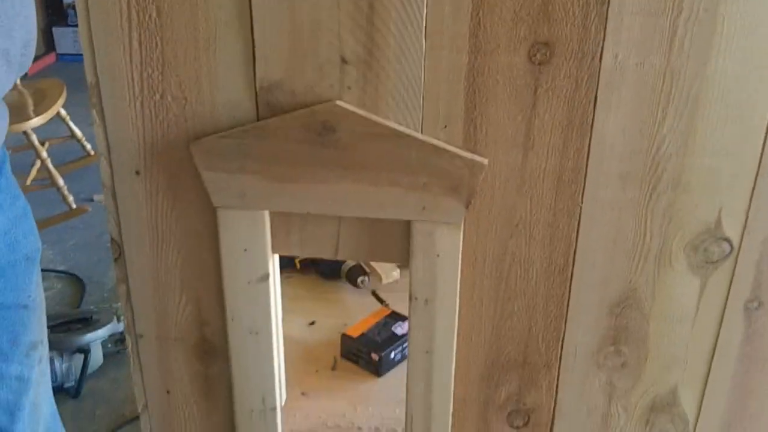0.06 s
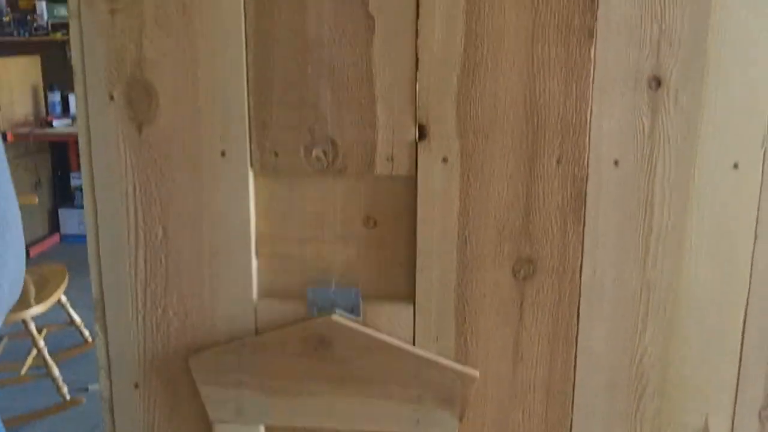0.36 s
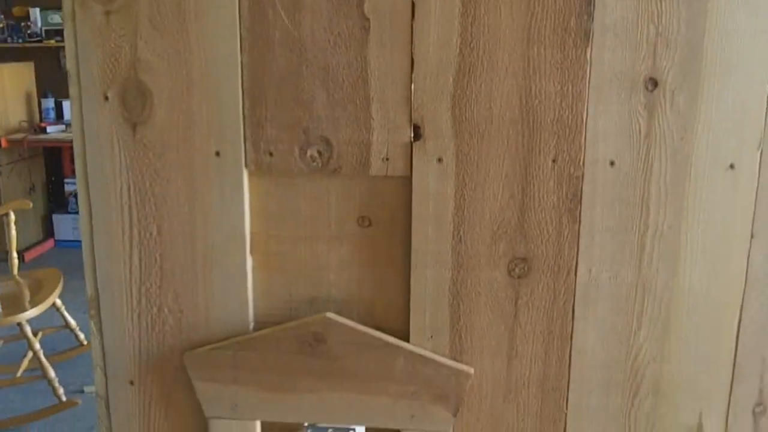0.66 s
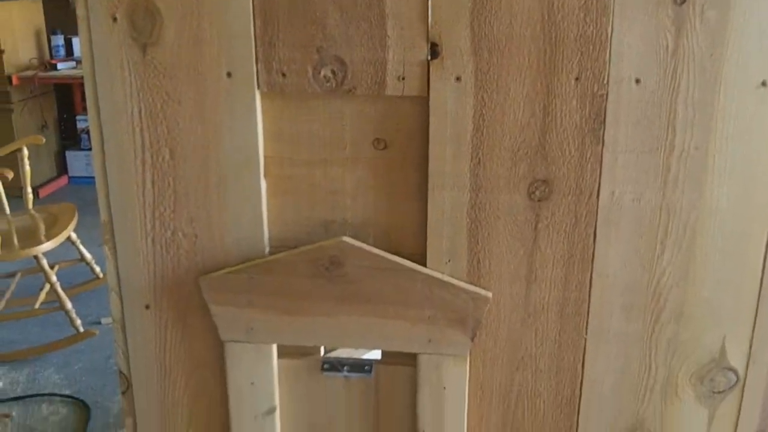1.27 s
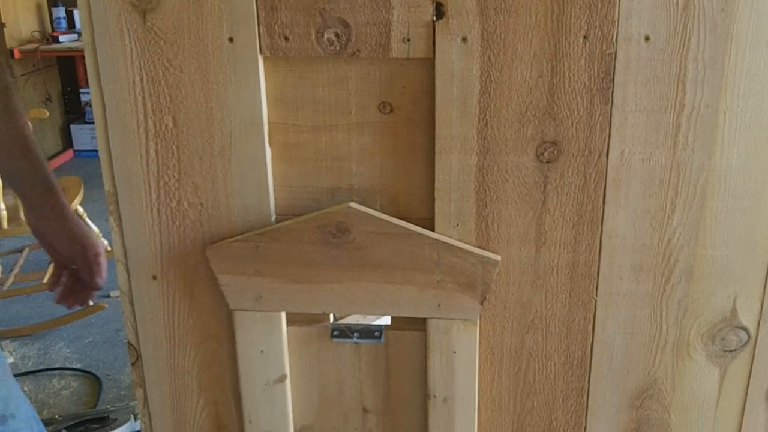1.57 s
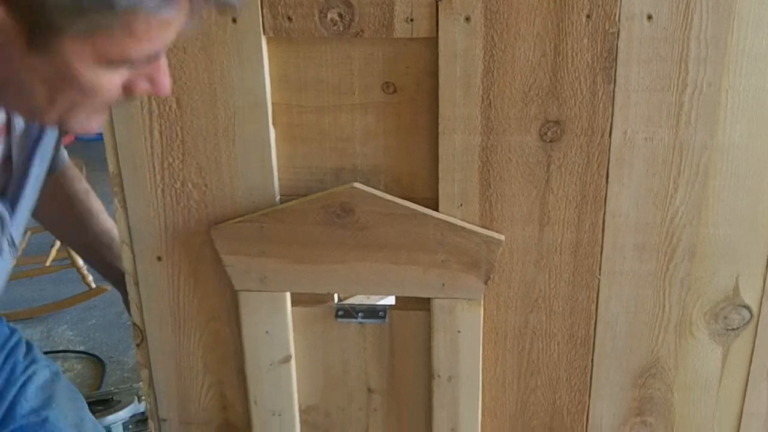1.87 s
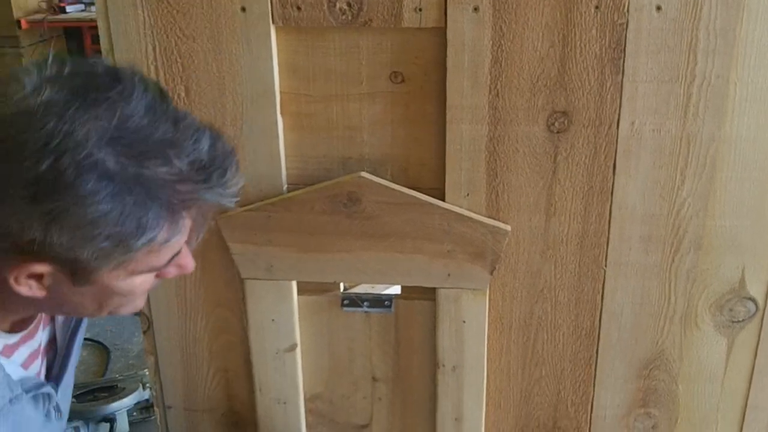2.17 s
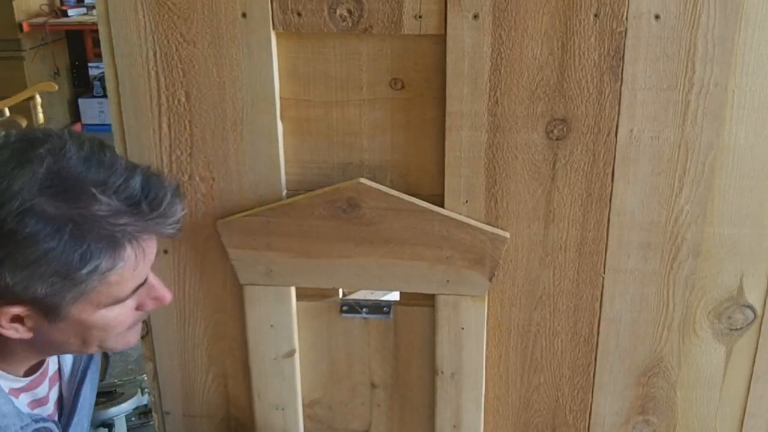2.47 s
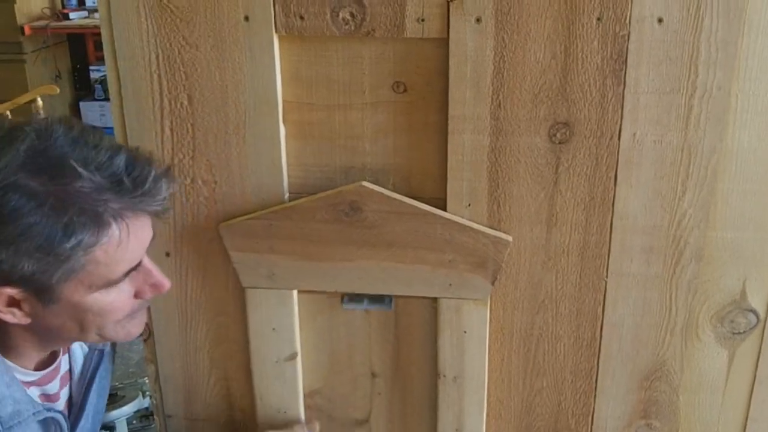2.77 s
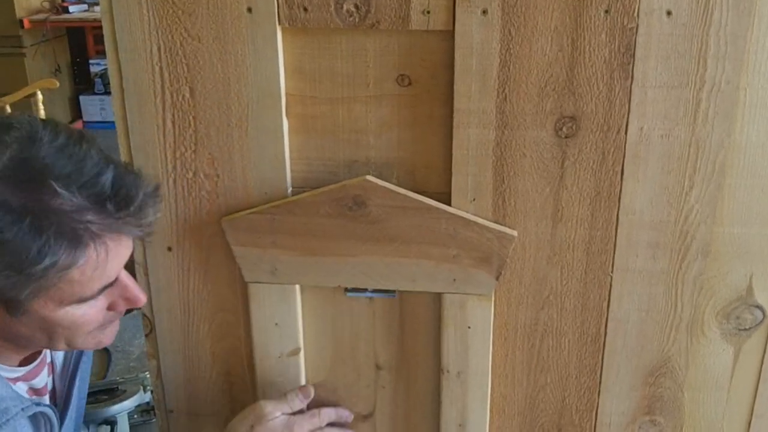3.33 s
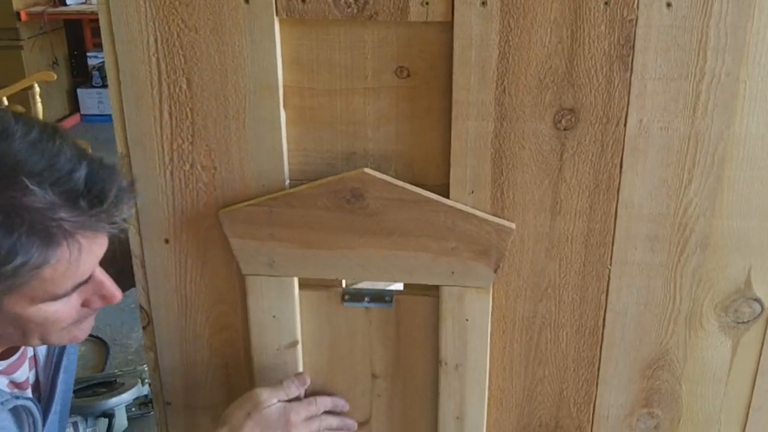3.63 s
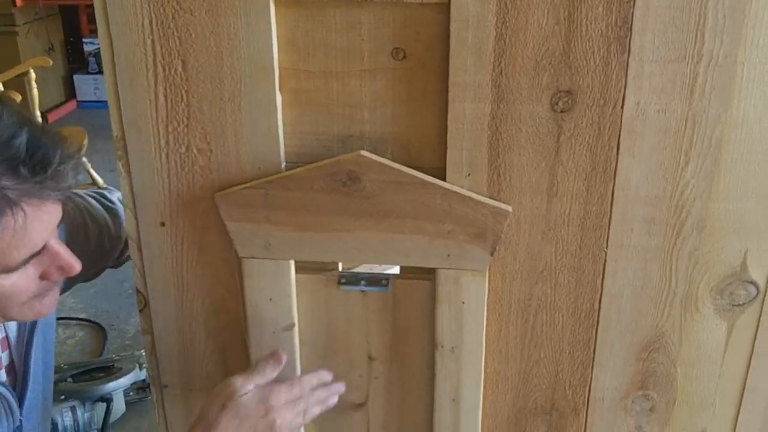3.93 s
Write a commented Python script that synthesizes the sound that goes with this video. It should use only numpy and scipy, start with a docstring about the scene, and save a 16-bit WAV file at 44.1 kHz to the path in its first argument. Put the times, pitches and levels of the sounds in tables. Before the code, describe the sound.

Wood sliding on wood, twice, with juddering scrapes, sharp knocks and tiny squeaks.

```python
"""Sliding wooden door panel

A small panel slides up its wooden frame and later down again, close by in a quiet workshop.
It scrapes in the grooves, binds and squeaks, and knocks against the boards, which ring briefly.
The wall judders with the friction and hums on after the lift.
Between the two strokes someone shifts their feet: soles scuff and cloth rustles."""
import sys
import numpy as np
from scipy import signal
from scipy.fft import rfft, irfft, next_fast_len
from scipy.io import wavfile
from scipy.ndimage import uniform_filter1d, map_coordinates

SR = 44100
rng = np.random.default_rng(int(sys.argv[2]) if len(sys.argv) > 2 else 0)


def unload_wav(signal):
    """Save mono or channel-first audio to the path in sys.argv[1] as 16-bit WAV at rate SR, clipped to [-1, 1]."""
    wavfile.write(
        sys.argv[1],
        SR,
        np.round(np.clip(np.atleast_2d(signal).T, -1, 1) * 32767).astype(np.int16),
    )


N = 176400


def amp(db):
    """Decibels to gain."""
    return 10 ** (np.asarray(db) / 20)


def unit(x):
    """Scale to rms 1."""
    return x / np.sqrt(np.mean(x ** 2) + 1e-20)


def steady(x):
    """Hold the running rms at 1."""
    return x / np.sqrt(np.abs(uniform_filter1d(x * x, size=5000)) + 1e-20)


def along(points, hz):
    """Interpolate (Hz, value) points on a log frequency axis."""
    f, v = np.transpose(points)
    return np.interp(np.log(hz + 1), np.log(f + 1), v)


def clock():
    """Time of every sample in seconds."""
    return np.arange(N) / SR


def wobble(per_s):
    """Smooth random curve, per_s knots a second."""
    return map_coordinates(rng.standard_normal(int(N * per_s / SR) + 4), [clock() * per_s])


def filtered(x, response):
    """Apply a complex frequency response."""
    size = 2 * next_fast_len(len(x))
    return irfft(rfft(x, size) * response(np.fft.rfftfreq(size, 1 / SR)), size)[:len(x)]


def causal(db):
    """Minimum-phase response with this gain."""
    cepstrum = irfft(np.log(amp(db)))
    cepstrum[1:len(cepstrum) // 2] *= 2
    cepstrum[len(cepstrum) // 2 + 1:] = 0
    return np.exp(rfft(cepstrum))


def resonance(f, hz, width_hz):
    """One resonance of peak gain 1."""
    return 1j * f * width_hz / (hz * hz - f * f + 1j * f * width_hz)


def noise(spectrum):
    """Coloured noise of rms 1."""
    return unit(filtered(rng.standard_normal(N), lambda f: amp(along(spectrum, f))))


def slips(per_s, size):
    """Friction impulses of random time and strength."""
    return (rng.random(size) < per_s / SR) * rng.standard_normal(size)


def add(out, start_s, x):
    """Mix x into out from start_s."""
    part = out[max(0, round(start_s * SR)):][:len(x)]
    part += x[:len(part)]


# Clatter spectrum of the boards. Each row: frequency in Hz, level in dB.
WOOD_SPECTRUM = [(60, -11), (1200, 3), (2400, 3.5), (4000, -4), (5200, -15), (6500, -18.5), (8000, -35),
                 (10000, -32.5), (16000, -48.5)]
BRIGHT_FROM_HZ, BRIGHT_FULL_HZ, TOP_HZ = 1660, 4670, 8900


def wood(force, bright_db, top_db):
    """The boards colour a contact force, with a treble tilt for the hardness of the contact."""
    tilt = [(BRIGHT_FROM_HZ, 0), (BRIGHT_FULL_HZ, bright_db), (TOP_HZ, top_db)]
    return filtered(force, lambda f: causal(along(WOOD_SPECTRUM, f) + along(tilt, f)))


# Ring of the boards: three thuds, a hollow note, then bright modes.
# Each row: frequency in Hz, level in dB, t60 in seconds.
BOARD_MODES = [(238, 2, 0.082), (376, -1, 0.049), (544.4, -5.5, 0.064), (892, 4, 0.019), (1646, -8, 0.054),
               (2272, -1.5, 0.023), (2690, -11, 0.023), (3062, -2.5, 0.029), (3940, -8.5, .03)]
# Blows on the frame. Each row: start in seconds, level in dB, thud in dB, hollow note in dB,
# brightness in dB, clatter t60 in seconds.
FRAME_KNOCKS = [(.026, -24, -10, -4, -3.5, 0.054), (.081, -25, -10, 6, -20, 0.074),
                (0.1496, -11.5, -16.5, 8.5, -2, 0.033), (0.375, -22.5, -7, 12.5, -4, .02),
                (.488, -32, -18, -6, -7.5, .03), (.720, -9.5, -20.5, -21, 9.5, 0.04),
                (.984, -25.5, -29, -19, 19, 0.035), (2.739, -41, 2.5, 5.5, 15, 0.048),
                (2.806, -48.5, 11, 9, -1, 0.054), (2.866, -38, 7.5, 2.5, -1, 0.061),
                (2.953, -12.5, -2.5, -4, 1.5, 0.051), (3.080, -11.5, -13.5, -11, 1, 0.022),
                (3.192, -21.5, -11, -3, 14.5, 0.057), (3.364, -33, -12, 5.5, -52, 0.056),
                (3.4017, -12, -3, 1, 14, 0.037), (3.641, -13, -10, 0.5, 11, 0.036),
                (3.662, -21, -12, -5, 16, 0.022), (3.807, -12.5, -4, -5.5, -2, 0.053),
                (3.886, -19, -15, 4, 4.5, 0.066)]
ATTACK_S, SNAP_DB, RING_DB = 0.0008, 6.5, 1.5


def knocks():
    """The panel hits the frame: a snap, a short clatter and the ringing modes of the boards."""
    out, t = np.zeros(N), np.arange(SR // 5) / SR
    hz, mode_db, t60_s = np.transpose(BOARD_MODES)[:, :, None]
    rise = 1 - np.exp(-t / ATTACK_S)
    for start_s, db, thud_db, hollow_db, bright_db, clatter_t60_s in FRAME_KNOCKS:
        top_db = 23.5 + 0.88 * db  # weaker blows are duller
        burst = rng.standard_normal(len(t)) * rise * amp(-60 * t / clatter_t60_s)
        clatter = wood(burst, bright_db, top_db - 18)
        snap = wood(signal.unit_impulse(len(t)), bright_db, top_db)
        contact = clatter / np.std(clatter[:SR // 200]) + amp(SNAP_DB) * snap / np.abs(snap).max()
        detune, scatter_db, polarity = rng.standard_normal((3, len(BOARD_MODES), 1))
        struck_db = mode_db + np.select([hz < 600, hz < 1100], [thud_db, hollow_db]) + scatter_db
        pitch_hz = hz * (1 + 0.016 * detune)
        modes = amp(struck_db - 60 * t / t60_s) * np.sign(polarity) * np.sin(2 * np.pi * pitch_hz * t)
        add(out, start_s, amp(db) * (contact + amp(RING_DB) * rise * modes.sum(axis=0)))
    return out


# The panel's travel up, then down. Each row: time in seconds, judder in dB, scrape in dB.
UP_STROKE = [(0, -26, -32), (.07, -39, -46.5), (.135, -34, -51.5), (.18, -32, -35.5), (.32, -30, -38),
             (.43, -36, -30), (.515, -36, -50.5), (.56, -30.5, -25.5), (.69, -33, -39), (.83, -35.5, -34),
             (1.0, -43.5, -40.5), (1.05, -49, -51.5), (1.45, -63.5, -71.5)]
DOWN_STROKE = [(2.72, -82, -95.5), (2.75, -41.5, -50), (2.85, -45.5, -64.5), (2.92, -30.5, -37.5),
               (2.98, -28, -41), (3.12, -34.5, -32), (3.2, -28, -30), (3.37, -33, -42.5),
               (3.44, -28.5, -30.5), (3.54, -30, -41), (3.62, -26.5, -35.5), (3.77, -31.5, -36),
               (3.92, -29, -31), (4.0, -27, -37.5)]


def stroke(rows):
    """Judder and scrape gains along one stroke, silent outside it."""
    t = clock()
    times_s, *levels_db = np.transpose(rows)
    moving = (t >= times_s[0] - 0.05) & (t <= times_s[-1] + 0.05)
    return np.array([amp(np.interp(t, times_s, db)) for db in levels_db]) * moving


# Wood rubbing on wood. Each row: frequency in Hz, level in dB.
SCRAPE_SPECTRUM = [(100, -14.5), (450, -5.5), (950, 5), (1500, -1.5), (3000, -4), (4000, -8.5),
                   (5000, -14.5), (6200, -20.5), (7900, -41.5), (9000, -39), (16000, -65.5)]
FINE_SLIPS_PER_S, BOARD_T60_S = 3500, 0.042
GROOVE_HZ, GROOVE_WIDTH_HZ, GROOVE_DB = [2272, 2752, 3246, 3878], 53, 1


def scrape():
    """Fine slips excite the boards and the groove notes; the colour drifts as the contact moves."""
    t = np.arange(SR // 10) / SR
    board_ring = rng.standard_normal(len(t)) * amp(-60 * t / BOARD_T60_S)
    force = slips(FINE_SLIPS_PER_S, N) * amp(wobble(per_s=57))
    ringing = signal.fftconvolve(force, board_ring / np.linalg.norm(board_ring))[:N]
    rub = filtered(force + 0.5 * ringing, lambda f: causal(along(SCRAPE_SPECTRUM, f)))
    notes = filtered(rub, lambda f: sum(resonance(f, hz, GROOVE_WIDTH_HZ) for hz in GROOVE_HZ))
    travel = np.cumsum(1 + 0.025 * wobble(per_s=9))
    drifting = map_coordinates(rub + amp(GROOVE_DB) * notes, [travel], mode="mirror")
    _, gain = stroke(UP_STROKE) + stroke(DOWN_STROKE)
    return gain * unit(drifting)


# Wall resonances. Each row: frequency in Hz, width in Hz, level in dB.
WALL_MODES = [(100.6, 16, -1), (187.9, 18, 1.5), (234, 17.7, 3.5), (300, 19, 0.5), (350, 65, -3),
              (467, 71.5, -4.5)]
COARSE_SLIPS_PER_S, PUSH_DB, PUSHES_PER_S = 900, 1.5, 22


def judder():
    """Coarse slips shake the wall as the hand moves the panel in uneven pushes."""
    def wall(f):
        modes = sum((-1) ** k * amp(db) * resonance(f, hz, width_hz)
                    for k, (hz, width_hz, db) in enumerate(WALL_MODES))
        return modes / (1 + (f / 900) ** 4)

    shake = steady(filtered(slips(COARSE_SLIPS_PER_S, N), wall))
    gain, _ = stroke(UP_STROKE) + stroke(DOWN_STROKE)
    return gain * unit(shake * amp(PUSH_DB * wobble(PUSHES_PER_S)))


# The panel binds. Each row: start in seconds, length in seconds, level in dB, brightness in dB,
# squeak pitch in Hz, squeak over grating in dB.
PANEL_CATCHES = [(0.349, 0.016, -23, 4, 908.5, -4.5), (0.373, 0.0018, -23, 0, 1887, 5),
                 (0.395, 0.0043, -24.5, -3, 2037, 1.5), (0.5309, 0.013, -14, 2, 1894, -4),
                 (0.577, 0.0024, -18, 2, 2373, -0.5), (0.901, 0.073, -33.5, 12, 3120, -10),
                 (0.929, 0.0049, -21, 7, 2750, 3), (1.207, 0.13, -69.5, 14, 1660, 6),
                 (2.896, 0.032, -36.5, 8, 996, -5), (2.935, 0.016, -29, 4, 896, 1.5),
                 (3.06, 0.02, -28.5, 9, 923, 0), (3.5502, 0.042, -35, -6, 868, 6),
                 (3.785, 0.013, -28.5, -7, 883, 9.5)]
WAVER_HZ, FLUTTER_DB, RELEASE_T60_S = 97, 4.6, 0.047


def catches():
    """A run of harder slips grates and squeaks on one unsteady note, then rings out."""
    out, t = np.zeros(N), np.arange(SR // 5) / SR
    for start_s, length_s, db, bright_db, squeak_hz, squeak_db in PANEL_CATCHES:
        grate = unit(wood(slips(FINE_SLIPS_PER_S, len(t)), bright_db, top_db=-5))
        pitch_hz = squeak_hz + WAVER_HZ * wobble(per_s=600)[:len(t)]
        flutter = amp(FLUTTER_DB * wobble(per_s=280)[:len(t)])
        squeak = unit(np.sin(2 * np.pi * np.cumsum(pitch_hz) / SR) * flutter)
        gate = np.minimum(t / ATTACK_S, 1) * amp(-60 * np.maximum(t - length_s, 0) / RELEASE_T60_S)
        add(out, start_s, amp(db) * gate * (grate + amp(squeak_db) * squeak))
    return out


def rasp(rubbing):
    """Hard rubbing adds a thin sizzle that grows faster than its treble."""
    treble = filtered(rubbing, lambda f: np.minimum(f / BRIGHT_FULL_HZ, 1) ** 2)
    treble_rms = np.sqrt(np.abs(uniform_filter1d(treble ** 2, size=SR // 200)))
    sizzle = filtered(rng.standard_normal(N), lambda f: resonance(f, hz=13300, width_hz=700) ** 2)
    return amp(-23.5) * treble_rms ** 1.2 * unit(sizzle)


# Spells of hard drag. Each row: start in seconds, length in seconds, level in dB.
WALL_SHUDDERS = [(0.531, .18, -36.5), (3, 1.0, -43.5)]


def shudders():
    """The whole wall shakes slowly when the panel drags hard."""
    shake = filtered(rng.standard_normal(N), lambda f: resonance(f, hz=38.5, width_hz=19) ** 2)
    gain = np.zeros(N)
    for start_s, length_s, db in WALL_SHUDDERS:
        end_s = start_s + length_s
        gain += amp(db) * np.interp(clock(), [start_s - 0.02, start_s, end_s, end_s + 0.023], [0, 1, 1, 0])
    return gain * steady(shake)


HUM_HZ, HUM_DB, HUM_PEAK_S, HUM_RISE_DB_PER_S, HUM_T60_S = 122.3, -36, 0.83, 200, 1.44


def wall_hum():
    """A low note of the wall swells as the lift ends, then rings on."""
    t = clock() - HUM_PEAK_S
    level_db = HUM_DB + np.where(t < 0, HUM_RISE_DB_PER_S * t, -60 * t / HUM_T60_S)
    pitch_hz = HUM_HZ * (1 + 0.038 * wobble(per_s=100))
    return amp(level_db) * np.sin(2 * np.pi * np.cumsum(pitch_hz) / SR)


# Spectra of soles and cloth. Each row: frequency in Hz, level in dB.
SOLE_SPECTRUM = [(60, -2), (200, 4.5), (420, 0.5), (800, -10.5), (1500, -19.5), (5000, -55)]
CLOTH_SPECTRUM = [(500, -12.5), (3000, 7.5), (4300, 0), (7000, -18.5), (15000, -36.5)]
# Shifts of the feet. Each row: peak time in seconds, 12 dB rise in seconds, 35 dB fall in seconds,
# sole in dB, cloth in dB.
FOOT_SHUFFLES = [(1.725, 0.048, 0.25, -81, -54.5), (1.856, 0.0031, 0.54, -40.5, -57),
                 (1.918, 0.016, 0.14, -41, -42), (2.24, 0.04, 0.17, -41, -58)]


def shuffles():
    """Soles scuff the floor and cloth rustles in soft swells."""
    out, t = np.zeros(N), clock()
    sole = noise(SOLE_SPECTRUM)
    cloth = noise(CLOTH_SPECTRUM) * amp(2.8 * wobble(per_s=150))
    for peak_s, rise_s, fall_s, sole_db, cloth_db in FOOT_SHUFFLES:
        swell_db = np.where(t < peak_s, 12 * (t - peak_s) / rise_s, 35 * (peak_s - t) / fall_s)
        out += amp(swell_db) * (amp(sole_db) * sole + amp(cloth_db) * cloth)
    return out


# Workshop decay. Each row: frequency in Hz, t60 in seconds.
ROOM_DECAY = [(100, 0.61), (3000, 0.29), (12000, 0.27)]
ROOM_DB, ROOM_CUTOFF_HZ, ROOM_BUILD_S = -18, 7000, 0.014


def reverb(near):
    """The workshop's diffuse reflections; the treble dies first."""
    hz, t, bands = signal.stft(rng.standard_normal(SR // 2), SR, nperseg=256)
    decay = amp(-60 * t / along(ROOM_DECAY, hz)[:, None])
    _, tail = signal.istft(bands * decay, SR, nperseg=256)
    tail = filtered(tail, lambda f: 1 / (1 + (f / ROOM_CUTOFF_HZ) ** 4))
    tail *= np.minimum(np.arange(len(tail)) / SR / ROOM_BUILD_S, 1)
    return amp(ROOM_DB) * signal.fftconvolve(near, tail / np.linalg.norm(tail))[:N]


# Workshop background. Each row: frequency in Hz, level in dB.
AIR_SPECTRUM = [(25, 2), (270, -9), (4000, -28), (6500, -33), (7900, -49.5), (9000, -36.5), (15000, -36),
                (16000, -61)]


def air():
    """Faint, steady rumble and hiss of the still room."""
    return amp(-54) * noise(AIR_SPECTRUM)


def scene():
    """Panel, wall and feet in the workshop, in mono."""
    rubbing = catches() + scrape()
    near = knocks() + rubbing + rasp(rubbing) + judder() + shuffles()
    return (near + reverb(near) + shudders() + wall_hum() + air())[None]


CLIP_CEILING, BAND_LIMIT_HZ = 1.05, 16400


def record(dry):
    """Soft clipping of the hardest knocks, then a sharp low-pass."""
    clipped = dry[0] / (1 + np.abs(dry[0] / CLIP_CEILING) ** 8) ** (1 / 8)
    return filtered(clipped, lambda f: f < BAND_LIMIT_HZ)[None]


dry = scene()
out = record(dry)
unload_wav(out)
```